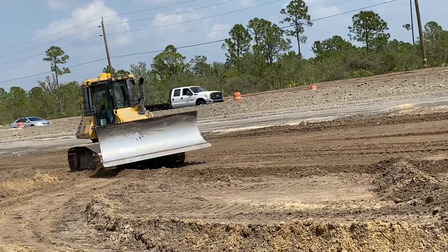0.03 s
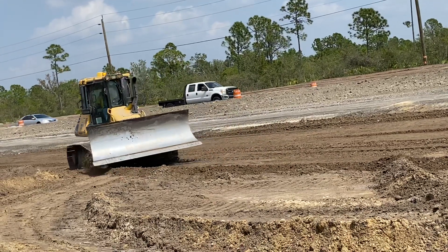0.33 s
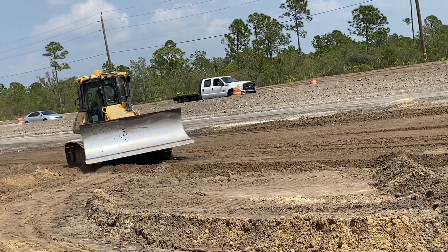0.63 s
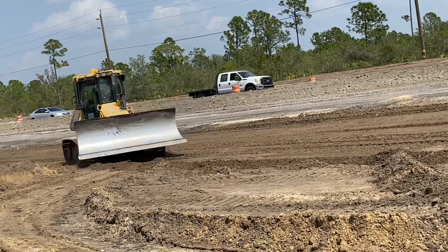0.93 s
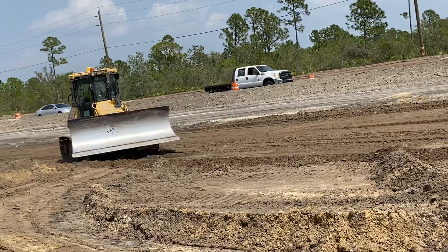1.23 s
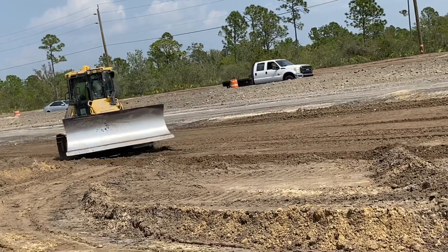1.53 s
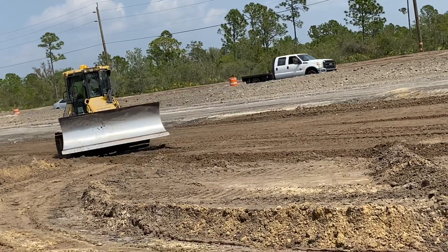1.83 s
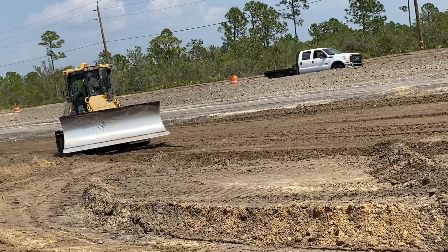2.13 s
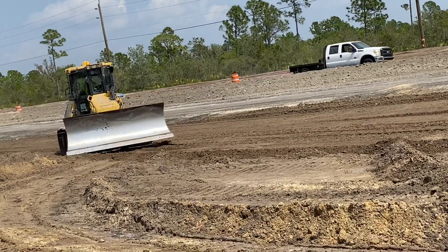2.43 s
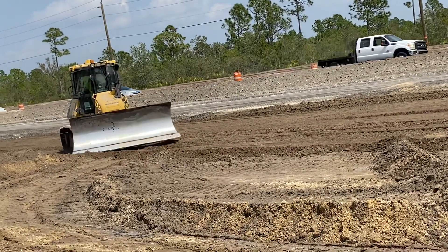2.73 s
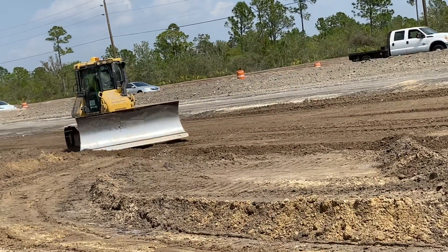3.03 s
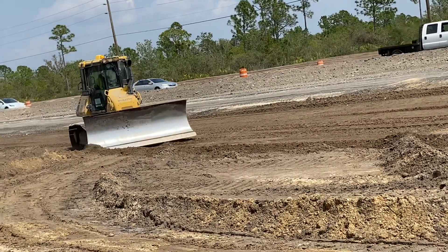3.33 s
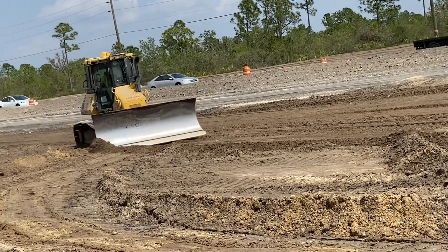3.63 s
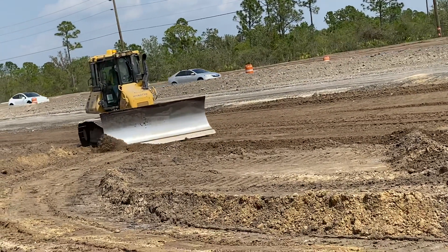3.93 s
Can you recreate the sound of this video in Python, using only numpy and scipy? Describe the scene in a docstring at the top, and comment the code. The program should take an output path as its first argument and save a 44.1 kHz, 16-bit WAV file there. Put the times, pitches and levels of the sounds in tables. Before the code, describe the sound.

Bulldozer crawling over dirt with a diesel rumble, clanking tracks and faint road noise behind.

```python
"""Bulldozer on a dirt site

A bulldozer crawls along some way off. Its diesel rumbles as uneven firings ring the exhaust, and
eases for a moment midway. The steel tracks clatter, squeak and clink, and grit cracks under
the shoes (the track plates). Tyres hiss on a road behind. Open air, heard almost in mono."""
import sys
import numpy as np
from scipy import signal
from scipy.fft import rfft, irfft
from scipy.io import wavfile
from scipy.ndimage import uniform_filter1d

SR = 44100
rng = np.random.default_rng(int(sys.argv[2]) if len(sys.argv) > 2 else 0)


def unload_wav(signal):
    """Save mono or channel-first audio to the path in sys.argv[1] as 16-bit WAV at rate SR, clipped to [-1, 1]."""
    wavfile.write(
        sys.argv[1],
        SR,
        np.round(np.clip(np.atleast_2d(signal).T, -1, 1) * 32767).astype(np.int16),
    )


N = 176400
T = np.arange(N) / SR

# How loud the road, the hiss of fan and surroundings, and the highest treble are: t/s, level/dB
TYRE_LEVEL = [(0, -43), (1.4, -55), (2.1, -54), (2.6, -43.5), (3.1, -38), (3.6, -38.5), (4, -43)]
HISS_LOUDNESS = [(0, -42), (1.3, -45.5), (1.9, -47), (2.3, -48), (2.9, -43), (3.5, -44.5), (4, -44)]
SIZZLE_LEVEL = [(0, -62), (1.6, -64.5), (1.95, -73), (2.6, -67), (3.0, -64.5), (4, -64.5)]
# Their tone colours (how strong each frequency is next to the others): f/Hz, level/dB
TYRE_COLOUR = [(200, 8), (400, -1), (680, 5.5), (830, 8), (990, 15), (1150, 0), (1400, -5), (2000, -14),
               (4000, -51)]
HISS_COLOUR = [(1000, 3), (2000, 8.5), (2650, 6.5), (2950, 7.5), (3400, 1.5), (4900, 2), (6500, -4),
               (8000, -13), (9000, -33.5)]
SIZZLE_COLOUR = [(9800, -1.5), (12000, 4), (14300, 5.5), (15500, 1.5)]

# Single crunches of grit, and the running crackle of small stones: t/s, level/dB
CRUNCHES = [(0.199, -40), (0.236, -51), (.291, -50), (0.335, -45), (0.394, -39), (0.464, -39.5),
            (0.598, -52), (.815, -50), (1.216, -48), (1.342, -50), (1.396, -45)]
CRACKLE_LEVEL = [(0, -57), (.76, -50.5), (1.3, -49), (1.6, -52.5), (1.9, -55), (4, -61)]
# Filters that colour those two sounds: f/Hz, level/dB
CRUNCH_FILTER = [(4500, 4), (9000, -6.5), (11800, 2), (15000, -10)]
CRACKLE_FILTER = [(2500, 12.5), (3700, 7.5), (5000, 4.5), (7000, -11), (11000, -14), (16000, -28)]
# Short rough squeaks and clinks of the tracks: t/s, length/s, f/Hz, level/dB, roughness/share of pitch
SQUEAKS_AND_CLINKS = [(0.191, 0.032, 6480, -44, 0.044), (0.29, .015, 5620, -45, 0.058),
                      (0.495, 0.031, 6180, -39.5, 0.062), (0.521, 0.017, 7250, -44.5, .02),
                      (0.723, .03, 3570, -51, 0.043), (0.812, 0.025, 6000, -45, 0.059),
                      (1.102, 0.033, 4400, -46.5, 0.059), (1.078, 0.042, 7100, -52, .06),
                      (1.191, 0.042, 6950, -48, .045), (1.198, 0.032, 4630, -44.5, 0.093),
                      (1.237, 0.015, 7200, -51, .025), (1.305, 0.031, 4520, -43, 0.067),
                      (1.344, 0.018, 4940, -43, 0.044), (1.387, 0.064, 6800, -52, 0.071),
                      (1.49, 0.015, 3280, -38, 0.066), (1.587, 0.029, 5040, -37, 0.019),
                      (2.818, 0.034, 5150, -38, 0.022)]
# How loud a rubbed roller rings: t/s, level/dB
ROLLER_LEVEL = [(0, -49), (.2, -42), (.5, -43.5), (.62, -49.5), (.95, -43), (1.15, -46.5), (1.4, -69)]

# How loud the running track clatter is: t/s, level/dB
CLATTER_LEVEL = [(0, -36.5), (.8, -35), (1.35, -36.5), (1.55, -33.5), (1.78, -38), (2.4, -41), (2.8, -41.5),
                 (3.15, -38.5), (3.7, -39), (4, -33)]
# Heavy clanks of the shoes: t/s, relative level/dB, fade time/s, bright clack level/dB
SHOE_CLANKS = [(0.717, -31, 0.033, -39), (1.061, -30.5, 0.018, -47), (1.492, -29.5, 0.013, -36),
               (1.52, -33, 0.01, -42), (1.617, -23.5, 0.027, -33), (1.711, -27.5, 0.024, -52),
               (1.745, -28, 0.034, -38), (1.786, -29, 0.019, -45), (2.324, -26, 0.0038, -55),
               (2.622, -31, .012, -52), (2.772, -35, 0.011, -60), (2.85, -30, 0.02, -60),
               (2.919, -20.5, 0.0079, -57), (3.111, -27, 0.015, -52), (3.25, -30, 0.013, -55),
               (3.364, -27, 0.016, -39), (3.431, -31, 0.012, -54), (3.498, -30, .012, -58),
               (3.611, -27.5, 0.016, -38), (3.651, -30, 0.016, -33), (3.675, -32, 0.014, -54),
               (3.772, -26, 0.011, -47), (3.794, -40, 0.012, -37)]
# Filter that colours the steel clatter: f/Hz, level/dB
STEEL_FILTER = [(300, -6), (500, 3), (850, 4), (1350, -1), (1900, -6.5), (2600, -13), (4500, -20.5),
                (7000, -56), (14000, -49)]
# Ringing notes of the shoes, the hollow frame and the bright clack: f/Hz, relative level/dB
SHOE_NOTES = [(575, -3.5), (735, 1), (805, 1), (870, 1.5), (930, 2.5), (975, -1), (1210, 1.5), (1300, 2.5),
              (1400, 3.5), (1490, 2), (1700, 3), (1840, 0), (2100, 3.5)]
FRAME_NOTES = [(940, 3), (1035, 0.5), (1340, -4.5), (1490, -9.5)]
CLACK_NOTES = [(1520, 13), (2660, 11.5), (3020, 7), (3450, 4.5), (4050, 3.5), (4900, 0.5)]

# How fast the engine fires: t/s, f/Hz
FIRING_RATE = [(0, 76.07), (.8, 74.73), (1.4, 73.96), (1.75, 78.55), (2.1, 76), (2.5, 75), (3.0, 72.75),
               (3.4, 75.5), (4, 76.2)]
# How hard it works, heard as the strength of its growl: t/s, relative level/dB
ENGINE_LOAD = [(0, -24), (.22, -20.5), (.42, -24), (.88, -22.5), (1.06, -20.5), (1.2, -24), (1.48, -23),
               (1.71, -23.5), (1.97, -28.5), (2.06, -31.5), (2.42, -32), (2.7, -31.5), (3.03, -26),
               (3.3, -21.5), (3.6, -22.5), (3.86, -25), (4, -17.5)]
# Notes that the exhaust and hood ring at: f/Hz, filter width/Hz, relative level/dB
EXHAUST_NOTES = [(68.5, 110, -8.5), (121.2, 44, -0.5), (186, 49, -1), (270.7, 47.6, -1)]
# Hum that follows the load: multiple of the firing rate, level/dB at average load
LOAD_HUM = [(1.5, -37)]
# Throb and whines that come and go as the machine turns: multiple, list of (t/s, level/dB)
ENGINE_WHINES = [(1, [(0, -37), (1.5, -37), (2.1, -31.5), (2.55, -34), (2.92, -23), (3.12, -34), (4, -32)]),
                 (3.5, [(0, -44.5), (1.3, -55), (1.65, -32.5), (2.2, -42.5), (2.5, -50.5), (4, -56)]),
                 (6, [(0, -44.5), (1.2, -45.5), (1.6, -50.5), (2.05, -43.5), (2.35, -58), (3.0, -44.5),
                 (3.6, -48.5), (4, -49)]), (7, [(0, -55.5), (1.9, -50), (2.1, -45), (2.3, -54.5),
                 (4, -56)]), (9, [(0, -48.5), (1.5, -51.5), (2.3, -65), (3.2, -46.5), (4, -43.5)])]
# How loud the deep rumble is: t/s, level/dB
RUMBLE_LEVEL = [(0, -26.5), (.42, -27.5), (.58, -24), (.82, -27), (.98, -19), (1.15, -22.5), (1.48, -31),
                (1.74, -20.5), (2.0, -25.5), (2.15, -32.5), (2.56, -31.5), (2.72, -26), (2.98, -27),
                (3.1, -29.5), (3.35, -22.5), (3.8, -27.5), (4, -25)]
# Tone colours of the growl and the deep rumble: f/Hz, relative level/dB
GROWL_COLOUR = [(90, -1), (120, -0.5), (170, -2.5), (270, -7), (380, -17.5), (600, -27.5)]
RUMBLE_COLOUR = [(25, -30), (40, -10.5), (55, -2), (72, -2), (100, -4.5), (130, -11.5)]
# Thumps of the hull on uneven ground: t/s, level/dB
HULL_THUMPS = [(.928, -36), (2.211, -23), (2.626, -24.5)]
# Left-right difference, compared with the sound both ears share: f/Hz, level/dB
STEREO_WIDTH = [(50, -22.5), (160, -17.5), (400, -18.5), (1200, -19.5), (4000, -38.5), (7000, -32),
                (9500, 11), (16000, -5.5)]


def from_db(db):
    """Turn decibels into a number to multiply by."""
    return 10 ** (np.asarray(db) / 20)


def rms(x):
    """The average strength of a signal (root mean square)."""
    return np.sqrt(np.mean(x ** 2) + 1e-20)


def rms_one(x):
    """Scale a signal to strength 1."""
    return x / rms(x)


def in_time(rows):
    """Join (time, value) points with straight lines."""
    return np.interp(T, *np.transpose(rows))


def gain_at(spectrum, hz):
    """Read a tone colour as gains, giving each octave equal room."""
    f, db = np.transpose(spectrum)
    return from_db(np.interp(np.log(hz + 1e-9), np.log(f), db))


def drift(rate_hz):
    """A smooth random wander, about 1 in size."""
    step, warm_up = 40, 2000
    r = np.exp(-2 * np.pi * rate_hz * step / SR)
    draws = rng.standard_normal(N // step + warm_up + 2)
    slow = signal.lfilter([1], [1, -2 * r, r * r], draws)[warm_up:]
    return np.interp(np.arange(N) / step, np.arange(len(slow)), rms_one(slow))


def colour(x, spectrum):
    """Filter a signal by a tone colour that fades beyond its ends; strength 1."""
    hz = np.arange(N // 2 + 1) * SR / N + 1e-3
    low_cut = 1 + (spectrum[0][0] / 1.3 / hz) ** 6
    high_cut = 1 + (hz / 1.3 / spectrum[-1][0]) ** 6
    return rms_one(irfft(rfft(x) * gain_at(spectrum, hz) / np.sqrt(low_cut * high_cut), N))


def noise(spectrum):
    """Noise with a given tone colour; strength 1."""
    return colour(rng.standard_normal(N), spectrum)


def burst(start, decay_s, rise_s=0.0014):
    """The outline of a hit: a quick rise, then a fade."""
    age = np.maximum(T - start, 0)
    return np.minimum(age / rise_s, 1) * np.exp(-np.clip((age - rise_s) / decay_s, 0, 20))


def rattle(per_s=2500):
    """Many tiny taps of uneven size at random times."""
    sizes = from_db(-0.5 * np.minimum(rng.exponential(1, N), 3)) * rng.choice([-1, 1], N)
    return sizes * (rng.random(N) < per_s / SR)


def ring(taps, hz, ring_s):
    """Each tap rings one note, which fades by 60 dB in ring_s seconds."""
    r, w = from_db(-60 / (ring_s * SR)), 2 * np.pi * hz / SR
    return signal.lfilter([0, np.sin(w)], [1, -2 * r * np.cos(w), r * r], taps + 1e-18)


def struck(taps, notes, ring_s):
    """Taps ring all the notes of a steel part at once; strength 1."""
    return rms_one(sum((-1) ** k * from_db(db) * ring(taps, hz, ring_s)
                       for k, (hz, db) in enumerate(notes)))


def background():
    """Tyres roar on the road, under an even hiss and a faint sizzle."""
    tyres = from_db(in_time(TYRE_LEVEL) + 0.38 * drift(18)) * noise(TYRE_COLOUR)
    hiss = from_db(in_time(HISS_LOUDNESS) + 0.63 * drift(16)) * noise(HISS_COLOUR)
    sizzle = from_db(in_time(SIZZLE_LEVEL) + 0.95 * drift(10)) * noise(SIZZLE_COLOUR)
    return tyres + hiss + sizzle


def stones(force, spectrum, per_s, pitches=48):
    """Small stones click, each at a pitch picked at random."""
    clicks = rattle(per_s) * force
    picked = rng.integers(0, pitches, N)
    clinks = sum(ring(clicks * (picked == k), hz, ring_s=0.018)
                 for k, hz in enumerate(np.geomspace(2800, 15500, pitches)))
    return colour(clinks, spectrum) * rms(force)


def grit():
    """Stones crack under the shoes in bright crunches, over a crackle that comes in clumps."""
    crunches = sum(from_db(db) * burst(t, decay_s=0.007, rise_s=0.0092) for t, db in CRUNCHES)
    crackle = from_db(in_time(CRACKLE_LEVEL) + 4.5 * np.tanh(drift(31)))
    return stones(crunches, CRUNCH_FILTER, per_s=3500) + stones(crackle, CRACKLE_FILTER, per_s=700)


def squeaks_and_clinks():
    """The tracks squeak and clink in short rough tones that rise a little."""
    waver = drift(900)
    sound = 0
    for t, length, hz, db, roughness in SQUEAKS_AND_CLINKS:
        progress = np.clip((T - t) / length, 0, 1)
        pitch = hz * (1 + 0.05 * (progress - 0.5) + roughness * waver)
        phase = 2 * np.pi * np.cumsum(pitch) / SR
        tone = np.sin(phase) + from_db(-24.5) * np.sin(2 * phase)
        sound += from_db(db) * np.sin(np.pi * progress) * tone
    return np.sqrt(2) * sound


def roller():
    """A rubbed roller rings roughly on one note."""
    level = from_db(in_time(ROLLER_LEVEL) + 2 * drift(4.2))
    return level * rms_one(ring(rattle(), hz=1835, ring_s=0.055))


def tracks(links_per_s=19, jitter=0.42, spread_db=4.5):
    """Links slap over the drive wheel and ring the shoes; hard hits add a hollow knock and a clack."""
    slaps = sum(from_db(spread_db * size) * burst((k + jitter * late) / links_per_s, decay_s=0.024)
                for k, (late, size) in enumerate(rng.uniform(-0.96, 1, (120, 2))))
    running = from_db(in_time(CLATTER_LEVEL)) * rms_one(0.87 + slaps)  # rattles between slaps too
    clanks = sum(from_db(db) * burst(t, decay) for t, db, decay, _ in SHOE_CLANKS)
    clacks = sum(from_db(db) * burst(t, 0.88 * decay) for t, _, decay, db in SHOE_CLANKS)
    force = np.hypot(running, from_db(-3) * clanks)
    taps = colour(rattle() * force, STEEL_FILTER)
    shoes = colour(struck(rattle() * force, SHOE_NOTES, ring_s=0.045), STEEL_FILTER)
    clatter = rms_one(taps + from_db(1) * shoes) * rms(force)
    knock = from_db(-5.5) * struck(rattle() * clanks, FRAME_NOTES, ring_s=0.032) * rms(clanks)
    return clatter + knock + clacks * struck(rattle(), CLACK_NOTES, ring_s=0.0094)


def exhaust(cycles, unevenness=0.89):
    """One firing per cycle, each of a different size, rings the exhaust and hood; strength 1."""
    firings = np.diff(np.floor(cycles), prepend=0) * (1 + unevenness * rng.standard_normal(N))
    ringing = 0
    for k, (hz, width, db) in enumerate(EXHAUST_NOTES):
        b, a = signal.iirpeak(hz, hz / width, fs=SR)
        ringing += (-1) ** k * from_db(db) * signal.lfilter(b, a, signal.lfilter(b, a, firings))
    return rms_one(ringing)


def engine_tones(cycles, load_db, waver_db=3.5):
    """Hum, throb and whines waver at multiples of the firing rate."""
    tones = [(multiple, db + 0.92 * (load_db - load_db.mean())) for multiple, db in LOAD_HUM]
    tones += [(multiple, in_time(curve)) for multiple, curve in ENGINE_WHINES]
    hum = 0
    for multiple, db in tones:
        level = from_db(db + waver_db * np.tanh(drift(8.5)))
        phase = 2 * np.pi * (multiple * cycles + rng.random() + 0.075 * drift(11))
        hum += level * np.sqrt(2) * np.sin(phase)
    return hum


def engine():
    """The diesel's exhaust and tones sit on a noisy growl and rumble, which swell as the hull thumps."""
    cycles = np.cumsum(in_time(FIRING_RATE)) / SR
    load_db = in_time(ENGINE_LOAD)
    chug = from_db(load_db - 7.5) * exhaust(cycles)
    hum = engine_tones(cycles, load_db)
    thumps = sum(from_db(db) * burst(t, decay_s=0.036, rise_s=0.0095) for t, db in HULL_THUMPS)
    growl = np.hypot(from_db(load_db - 4), thumps) * noise(GROWL_COLOUR)
    rumble = np.hypot(from_db(in_time(RUMBLE_LEVEL)), thumps) * noise(RUMBLE_COLOUR)
    return rumble + growl + chug + hum


def scene():
    """Everything lies ahead; tiny timing differences between the ears add a little width."""
    mid = engine() + tracks() + squeaks_and_clinks() + roller() + grit() + background()
    hz = np.arange(N // 2 + 1) * SR / N
    scatter = 1 + 0.36 * rms_one(uniform_filter1d(rng.standard_normal(len(hz)), size=60))
    side = irfft(1j * scatter * rfft(mid) * gain_at(STEREO_WIDTH, hz), N)  # 1j: a quarter-wave shift
    return np.array([mid + side, mid - side])


def record(dry, cutoff_hz=15800):
    """Cut off the very highest treble steeply."""
    return signal.sosfilt(signal.ellip(10, 0.2, 80, cutoff_hz, fs=SR, output="sos"), dry)


dry = scene()
out = record(dry)
unload_wav(out)
```